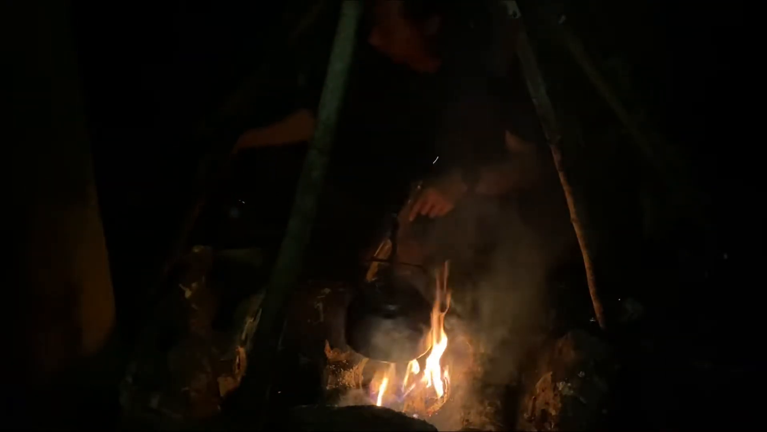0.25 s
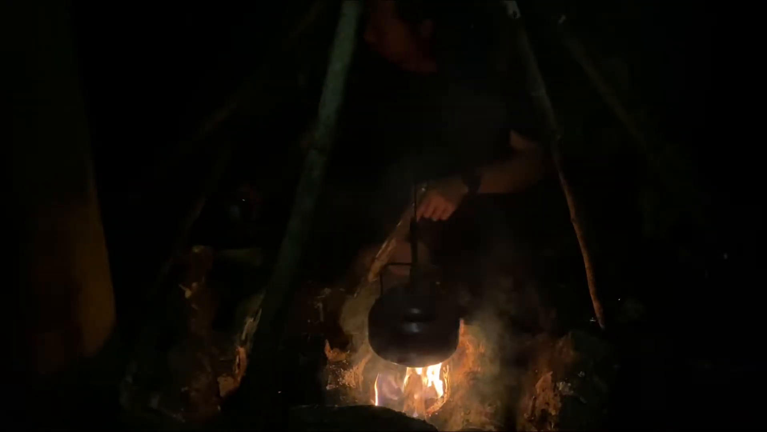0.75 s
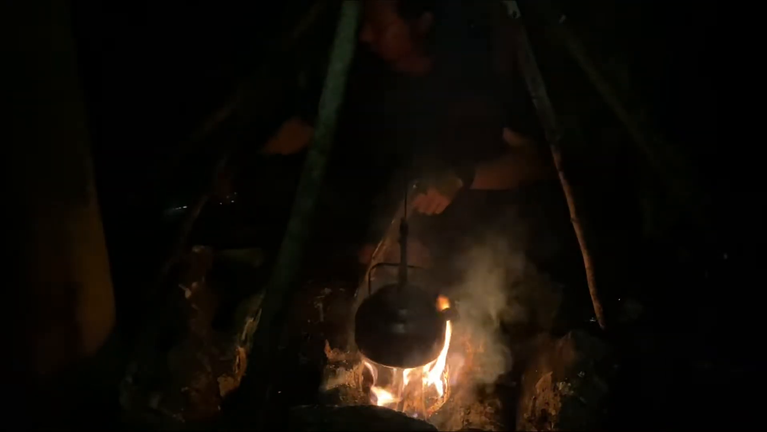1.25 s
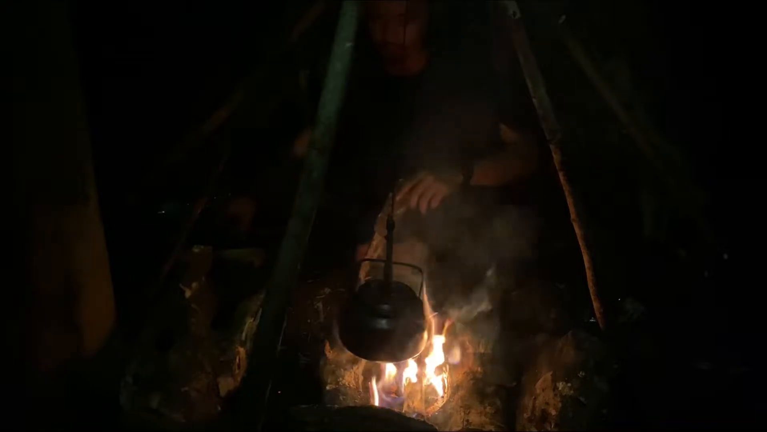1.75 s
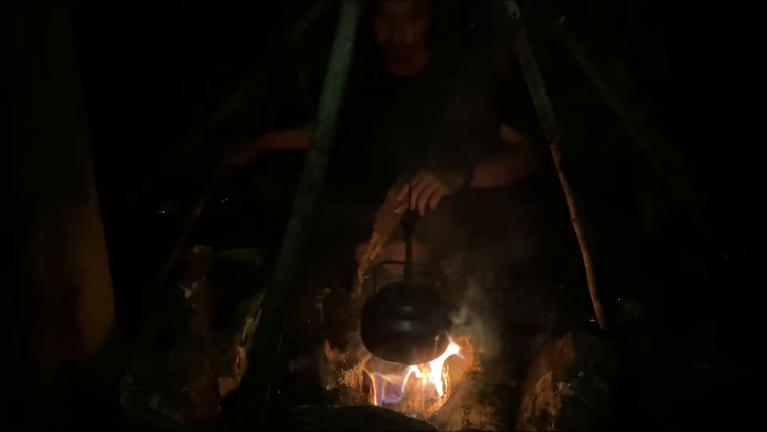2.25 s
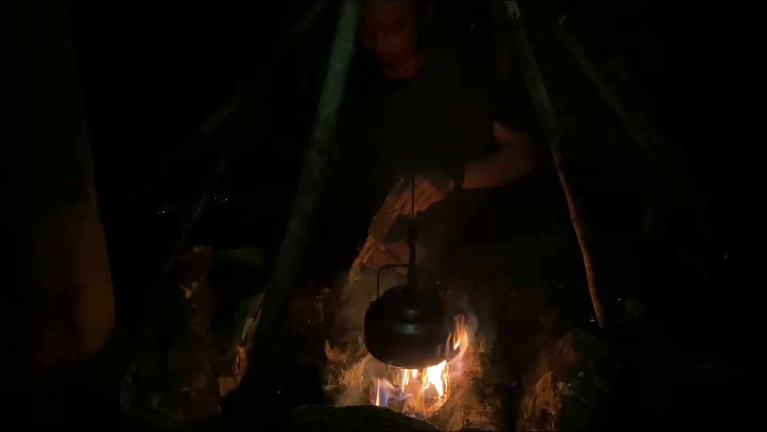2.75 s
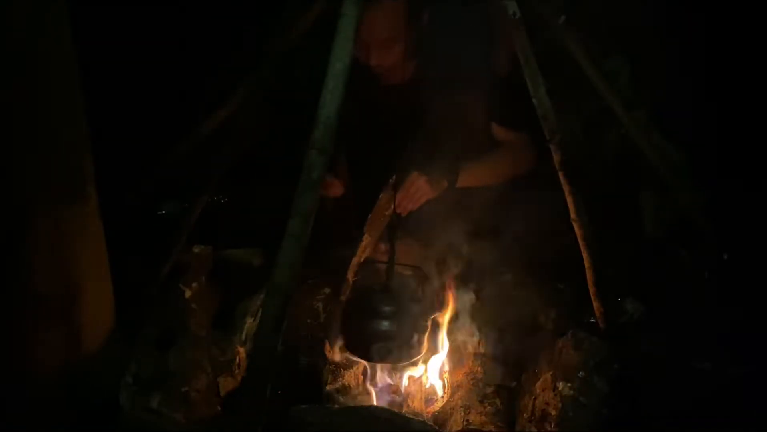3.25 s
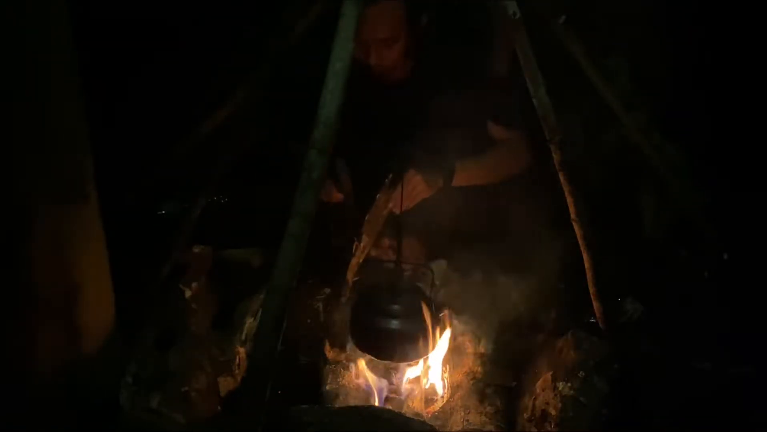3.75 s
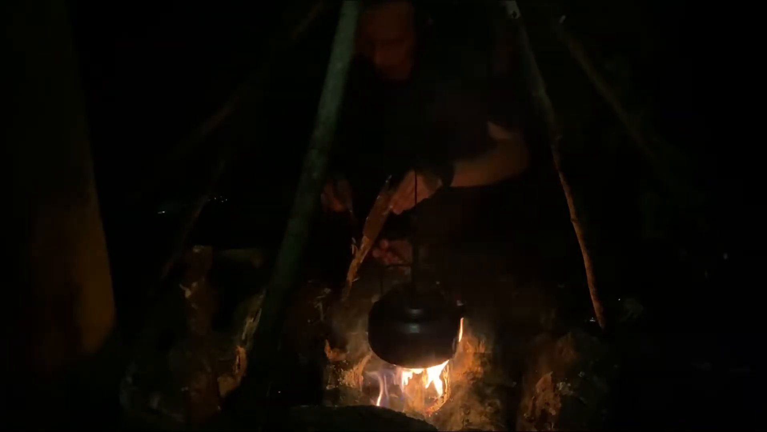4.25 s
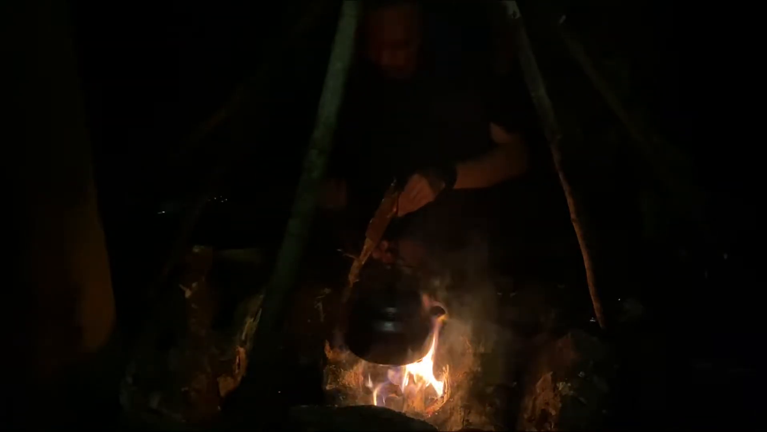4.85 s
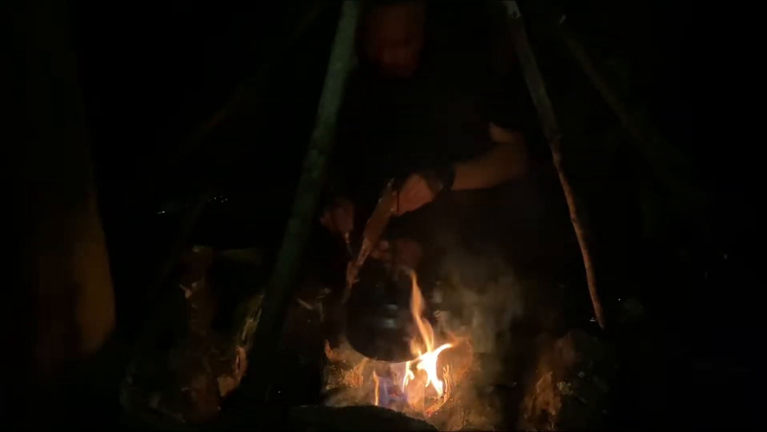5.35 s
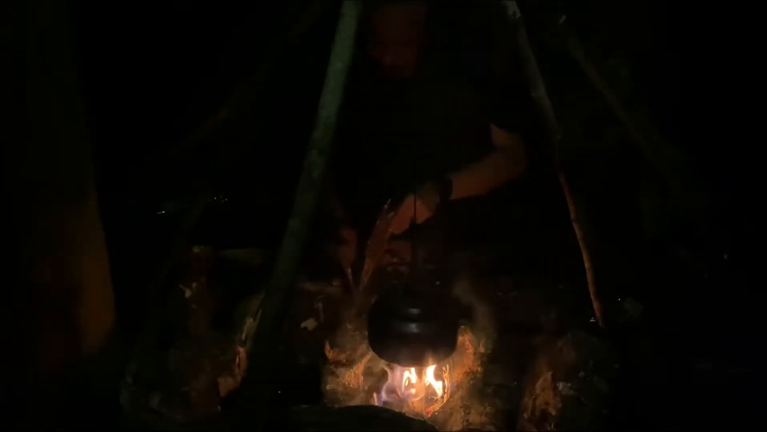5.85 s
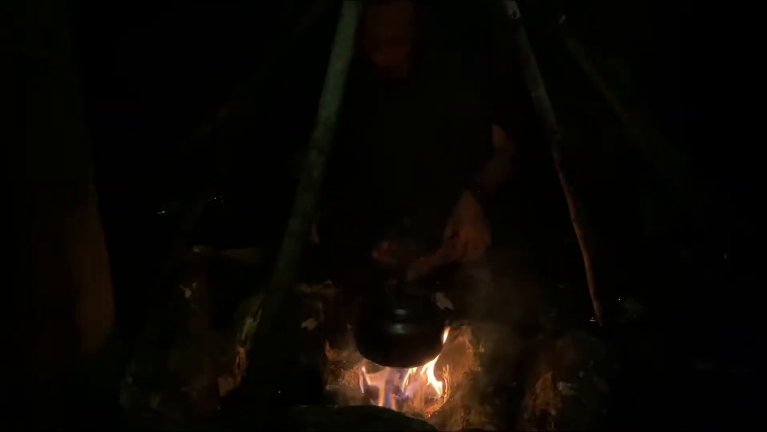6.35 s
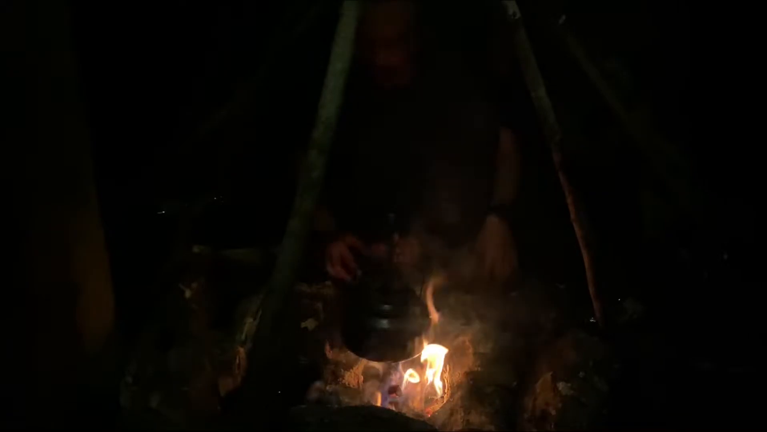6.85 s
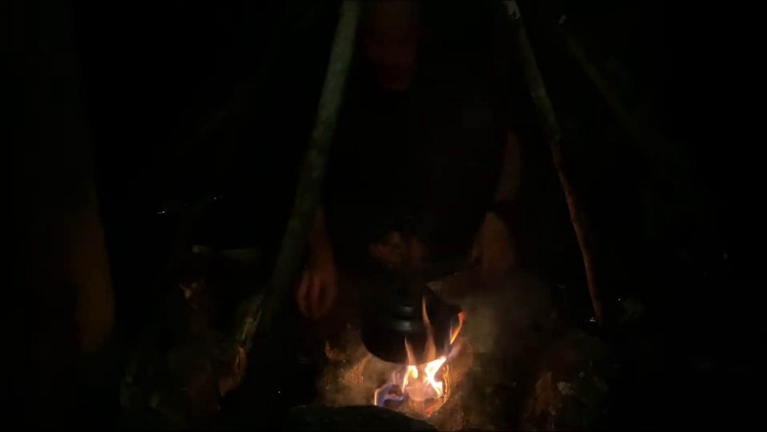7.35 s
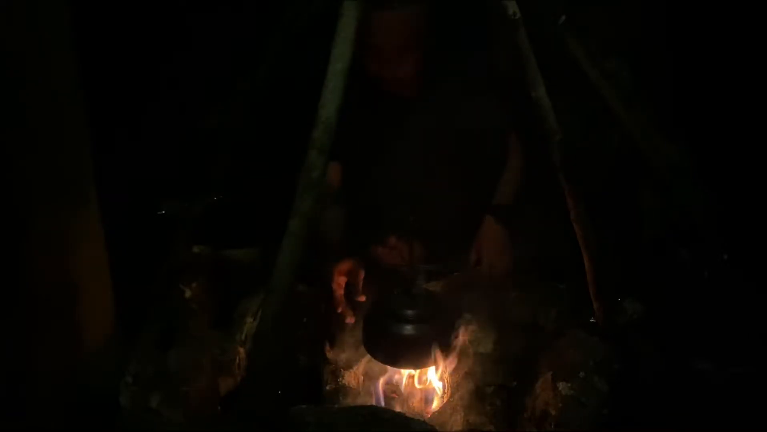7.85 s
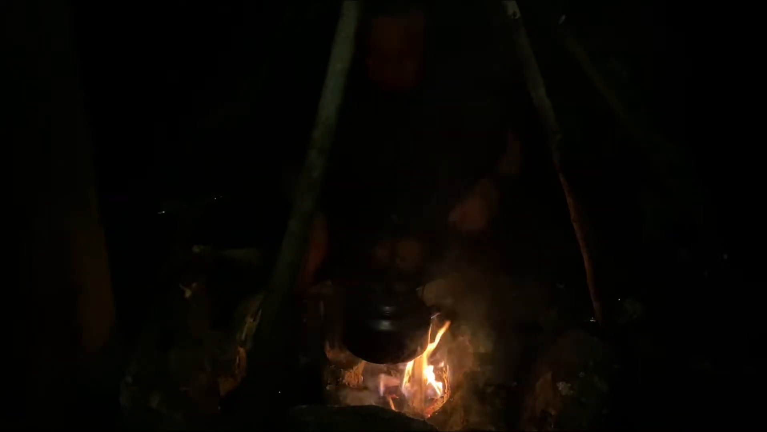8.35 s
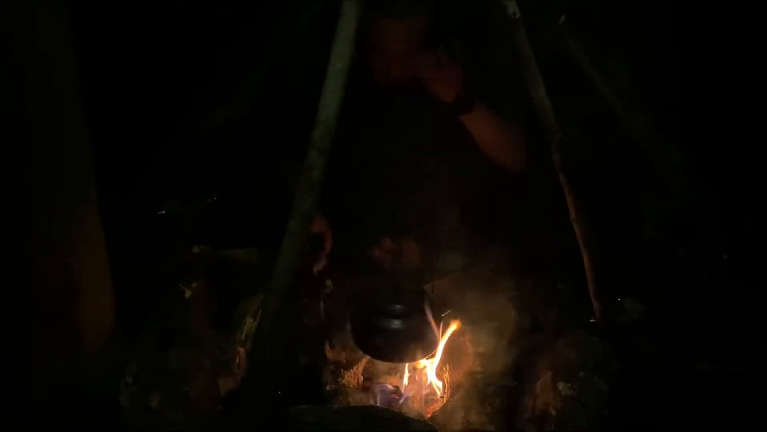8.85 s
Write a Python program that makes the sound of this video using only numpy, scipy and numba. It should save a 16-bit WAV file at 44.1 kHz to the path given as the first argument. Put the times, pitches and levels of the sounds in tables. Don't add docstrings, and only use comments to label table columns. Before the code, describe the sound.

A night forest camp: twigs snap in a quick bundle, heavier sticks crack sharply and thud on soil, over steady insect drone and low fire.

```python
import sys
import numpy as np
from scipy import signal
from scipy.fft import rfft, irfft, next_fast_len
from scipy.io import wavfile
from scipy.ndimage import uniform_filter1d
from numba import njit

SR = 44100
rng = np.random.default_rng(int(sys.argv[2]) if len(sys.argv) > 2 else 0)


def invert_db(x):
    u = np.asarray(x, float) / 20
    return 10 ** u


def waveform_to_disk(signal):
    frames = np.transpose(np.atleast_2d(signal))
    scaled = np.clip(frames, -1, 1) * 32767
    samples = np.round(scaled).astype(np.int16)
    wavfile.write(sys.argv[1], SR, samples)


N = 401442
HZ = np.fft.rfftfreq(next_fast_len(N), 1 / SR)

# start_s, level_db (600-2100 Hz), middle_db and treble_db (above level), fade_ms
TWIGS = [(0.756, -32, 9, -6, 50), (0.792, -36.5, 4, -15, 51), (0.987, -37.5, 11.5, -3, 28),
         (1.032, -29.5, 9.5, -6, 33), (1.061, -57, -1, 3, 21), (1.08, -29.5, 5.5, -4, 39),
         (1.11, -37.5, -7.5, -10, 33), (1.122, -37.5, 0.5, -5, 56), (1.147, -34, -3, -13, 44),
         (1.154, -36.5, 3, 4, 47), (1.166, -35.5, 2.5, -7, 53), (1.185, -40.5, 8, 5, 14),
         (1.216, -42, 2, -2, 120), (1.354, -50.5, 3, -2.5, 47), (1.468, -52, 11, -24, 28.6),
         (1.476, -46.5, 0, -9, 51), (1.502, -42.5, 3, -12, 33), (1.524, -46.5, 5, 3, 30),
         (1.551, -46, -1, -6, 30), (1.576, -49, -1, -10, 70), (1.595, -52, -2, -8, 60),
         (1.372, -55, 0, -6, 60), (1.395, -57, 0, -6, 70), (1.637, -54, 10, -1, 22), (1.681, -62, 9, 6, 25)]
# start_s, level_db (600-2100 Hz), treble_db (above level)
POPS = [(1.8, -56, -18), (2.268, -56, -3), (2.399, -55, 5.5), (2.498, -61, -4), (2.662, -74, -22),
        (3.027, -55, -27), (3.077, -63.5, -24), (3.272, -63, -4), (4.866, -57.5, -3.5), (5.016, -68, -9),
        (5.133, -64.5, 11), (5.862, -44.5, -23), (7.89, -55, -5), (8.583, -69, -21.5)]
# start_s, level_db (600-2100 Hz), middle_db and treble_db (above level), swell_ms
LOGS = [(3.536, -43, 7.5, 0, 3), (3.542, -44, 7, 3, 4), (3.547, -36, 4, 7, 5.8), (3.554, -50, 8, 7, 3),
        (4.031, -47, 12.5, 9, 5.1), (4.038, -37.5, 7.5, 6, 7), (4.045, -33, -12, -1, 2.8),
        (4.053, -48, 16, -14, 3.2), (4.534, -32, 2, -6.5, 7.9), (4.546, -32, 7.5, 11, 4.1),
        (4.557, -42.5, 8, -9, 4.1), (5.14, -34.5, -2, -14.5, 4.8), (5.15, -38, 11, 10, 2),
        (5.154, -41, 13, 10, 3), (5.157, -42, 12, 10, 3), (5.733, -30, -3, -12, 2), (5.736, -33, 6, 6, 3),
        (5.738, -26.5, 7, 8, 5.5), (5.744, -34, 8, 5, 2), (5.748, -45, 8, 3, 2), (6.806, -41, -5, -14, 1),
        (6.816, -37.5, -8.5, -17.5, 5)]
# (600-2100 Hz, relative to treble)
SPARKS = [(0.063, -54.5, -17), (0.546, -53.5, -28), (0.697, -47, -6), (0.727, -43, -16), (1.341, -58, -8),
          (3.699, -56, -24), (5.052, -64, -16), (5.286, -49, -26), (5.343, -45, -25), (5.46, -59, -23),
          (7.525, -61.5, -23.5), (7.959, -60, -20), (8.229, -61, -20.5), (6.43, -64, -19),
          (8.08, -64.5, -12.5), (4.33, -71, -18), (3.11, -74, -20), (7.06, -71, -20), (7.275, -72, -20)]
# frequency_hz, density_db (per Hz)
TWIG_COLOUR = [(150, -27), (250, 6), (1100, 11), (2490, 6), (4490, 1), (5830, -6.5), (6140, -6.5),
               (7440, -3), (8700, -14.5), (10900, -14), (13400, -14.5), (14900, -19), (16000, -49.5)]
THIN_COLOUR = [(300, -20), (600, -6), (800, 10), (1100, 11), (2490, 6), (4490, 1), (7440, -4), (10900, -14),
               (14900, -19), (16000, -49)]
LOG_COLOUR = [(150, -31), (250, 0), (557, 2.5), (2910, 0), (3460, 3), (3910, -2), (4650, 2), (5730, -4.5),
              (6820, -4), (9330, -17.5), (10700, -20.5), (13200, -19.5), (16000, -29)]
SPARK_COLOUR = [(250, 9), (1100, -7), (4500, -10), (8500, -4), (11500, 1.5), (13500, 5), (15500, -2),
                (16500, -30)]
THIN_TWIGS_FROM_S = 1.3
SNAP_SWELL_MS, POP_FADE_MS, SPARK_FADE_MS, LOG_FADE_MS = 0.8, 44, 17, 34
POP_MIDDLE_DB, SPARK_MIDDLE_DB = 1, 7

# start_s, peak_db, pitch_hz, fade_ms
KNOCKS = [(1.235, -37, 280, 37), (4.552, -29, 305, 60), (4.046, -33, 300, 60), (3.55, -38, 300, 60),
          (1.802, -49, 291, 97), (2.275, -41, 300, 28), (3.034, -50, 300, 100), (3.08, -48, 285, 64),
          (3.28, -54, 270, 64), (3.546, -36.5, 580, 70), (4.044, -25.5, 570, 25), (4.547, -22, 520, 44),
          (5.153, -9.5, 476, 15.5), (6.818, -46, 547, 40), (5.15, -24, 250, 60), (1.359, -53, 842, 83),
          (5.8615, -36, 1140, 22), (5.8615, -40, 1700, 20), (2.272, -52, 854, 60), (4.868, -62, 740, 84),
          (6.818, -51, 757, 320), (6.862, -52, 700, 90), (6.8394, -53, 1370, 180), (2.2714, -55, 1110, 55),
          (2.3974, -43, 1800, 30), (3.3942, -65.5, 1220, 70), (5.3426, -51, 1580, 52),
          (6.8174, -39, 1950, 55), (7.889, -53, 1180, 35), (8.5849, -61.5, 1130, 59),
          (4.5491, -20, 4744, 29), (5.3428, -39, 5080, 28), (5.7544, -34.5, 5240, 115),
          (0.758, -40, 1060, 40), (0.758, -40, 1800, 40), (1.034, -38, 1050, 40), (1.034, -36, 2150, 40),
         (1.034, -36, 5600, 30), (1.082, -37, 1100, 45), (1.082, -38, 2100, 50), (1.124, -43, 1300, 30),
         (1.152, -42, 1750, 90), (1.165, -43, 802, 50), (1.172, -46, 1080, 50), (1.186, -44, 900, 30),
         (1.217, -46, 700, 50), (1.16, -45, 425, 90), (1.238, -41, 436, 120), (1.24, -45, 581, 110),
         (1.245, -54, 910, 90), (1.388, -56, 1120, 140), (1.58, -52, 1100, 100), (1.58, -56, 1750, 90),
         (5.734, -34, 1500, 40), (5.741, -28, 1790, 50), (5.744, -20, 4600, 30), (5.743, -24, 5230, 40),
         (5.743, -25, 11100, 30), (5.742, -27, 10400, 40), (5.745, -28, 3450, 40), (5.152, -30, 2800, 35),
         (5.155, -28, 6800, 50), (6.808, -46, 800, 30), (6.818, -44, 1766, 45), (6.818, -48, 2358, 50)]
# crest_s, peak_db, pitch_hz, fade_ms
THUDS = [(1.25, -41, 132, 84), (3.5615, -32.5, 130, 90), (4.0625, -25, 117, 27), (4.5605, -25, 143, 69),
         (4.5675, -31, 125, 60), (5.1645, -22, 131, 56), (5.753, -31, 125, 46), (5.801, -26, 125, 70.3),
         (6.8348, -35, 160, 103), (6.8785, -30.5, 138, 33), (6.928, -40, 149, 48)]

# start_s, hold_s, level_db (600-2100 Hz), treble_db (above level)
RUSTLE = [(0.01, 0.027, -81, 6), (0.73, 0.097, -69, -5), (0.87, 0.046, -87, 15.5), (1.06, 0.12, -55, -13),
          (1.322, .1, -75.5, -11), (1.527, 0.087, -65.5, -2), (1.822, 0.017, -80, 3),
          (2.425, 0.16, -78.5, 1.5), (3.06, .04, -87, -15), (3.62, .03, -96.5, 22),
          (4.115, 0.026, -88, 7.5), (4.66, 0.082, -85.5, 9), (5.197, 0.055, -97, 25.5),
          (5.336, 0.022, -80, 12), (5.79, 0.12, -76, 9.5), (6.379, 0.087, -91.5, 14),
          (6.865, 0.04, -75, -5), (7.919, 0.062, -91, 5), (8.393, 0.071, -92, 7), (8.884, .06, -103, 22.5)]
STIR_DB_PER_S, SETTLE_DB_PER_S, HUSH_DB, HUSH_TREBLE_DB = 238.5, 138.5, -86.5, -100

# time_s, level_db, wing_resonance_hz
KATYDID = [(0.0, -73, 7200), (0.23, -61.5, 7260), (0.63, -57.5, 7180), (1.24, -54, 7290), (2.43, -52, 7396),
           (3.75, -53, 7450), (4.05, -55, 7520), (5.12, -55, 7460), (5.35, -65.5, 7590), (5.7, -75.5, 7250),
           (6.79, -78, 7360), (7.88, -84.5, 7440), (8.44, -62, 7220), (8.72, -58, 7180), (9.1, -54.5, 7310)]
KATYDID_WIDTH_HZ, KATYDID_GAIN_DB, OVERTONE_DB = 380, -2.14, -39
STROKES_HZ, SECOND_STROKE, STROKE_EVENNESS = 57, 0.25, 0.7

# time_s (9 ms after the chirp begins), level_db
CHIRPS = [(0.231, -66.5), (0.659, -64), (1.059, -70), (1.459, -65), (1.924, -66), (2.357, -65),
          (2.748, -65.5), (3.113, -66), (3.532, -61), (3.929, -61), (4.361, -72), (4.74, -66.5),
          (5.37, -66.5), (5.78, -65), (6.217, -64.5), (6.604, -66), (7.027, -64.5), (7.411, -64),
          (7.776, -64), (8.191, -65.5), (8.58, -64.5), (9.004, -64)]
CHIRP_FROM_HZ, CHIRP_TO_HZ, CHIRP_S, CHIRP_ECHO_DB, CHIRP_T60_S = 2960, 2564, 0.06, 10.5, 0.78

# frequency_hz, density_db (per Hz)
FIRE = [(15, -60.5), (25, -24), (30, -24.5), (41, -11), (65, 1.5), (78, -4), (91, -4), (123, -6),
        (220, -14), (296, -28), (651, -41.5), (2000, -66), (2200, -38.5), (2860, -56), (4840, -120)]
# time_s, roar_db
FLAMES = [
    (0.0, -53.5),
    (0.68, -53),
    (2.03, -56),
    (2.91, -53.5),
    (3.12, -57),
    (3.72, -54.5),
    (5.47, -56.5),
    (5.88, -54.5),
    (6.89, -54.5),
    (9.1, -57),
]
# pitch_hz, width_hz, level_db
DRONE = [
    (167.6, 9, -3),
    (217, 9.13, -3),
    (273, 12, -5),
    (326.5, 12, -9.5),
]
DRONE_DB, DRONE_FOLLOWS, DRONE_DIES_DB_PER_S, CALM_DB = -62.5, 1.78, 0.95, -54.5

# pitch_hz,
# width_hz, level_db, left_minus_right_db, likeness (0-1), throb_db
CHORUS = [(2440, 190, -72, -1, 0, 2.5), (2804, 380, -71.5, -3.5, 0.4, -2), (2959.5, 150, -60, 0, 0.03, 0),
          (3440, 140, -58.5, 1.5, 0, 1.5), (3678, 280, -70.5, 9, 0.1, 0.5), (4396, 720, -67.5, 4.5, 0, 1.5),
          (4680, 773, -65.5, 0.5, 0.55, 1), (5240, 430, -77.5, 3, 0.03, 1.5),
          (5833, 565, -58, 5.5, 0.03, -1.05), (7010, 280, -74, 0, 0.2, -2), (7335, 660, -61, -4.5, .15, 2),
          (11260, 3300, -88, 0, 0.8, 4.5), (14700, 1420, -93.5, -5.5, 0.71, 5)]

TRUNKS_T60_S, TRUNKS_DB, TRUNKS_DULL_HZ = 0.33, -21.5, 7000
# frequency_hz, left_lead_rad
PORT_LEAD = [(0, 0), (1380, 1.7), (3880, 3.9), (8100, 9.6), (8960, 9.4), (9730, 6.5), (11600, 6.0),
             (12500, 3.9), (14200, 2.7), (15300, 0)]
MIC_NOTCH_HZ, MIC_NOTCH_WIDTH_HZ, MIC_TOP_HZ, MIC_BASS_HZ, LIMIT = 13500, 800, 15800, 36, 0.6


def unit(x):
    return x / np.sqrt(np.mean(x ** 2))


def shape(x, gain):
    return irfft(rfft(x, next_fast_len(N)) * gain, next_fast_len(N))[..., :N]


def colour(points):
    hz, db = np.transpose(points)
    return invert_db(np.interp(np.log(HZ + 1), np.log(hz), db))


def curves(table):
    s, *columns = np.transpose(table)
    return [np.interp(np.arange(N) / SR, s, c) for c in columns]


def walk(rate):
    k = int(SR / rate)
    held = np.repeat(rng.standard_normal(N // k + 1), k)
    return 1.03 * uniform_filter1d(uniform_filter1d(held, k), k)[:N]


def pair(source, like):
    share = np.clip(like, 0, 1)
    return np.sqrt(share) * source() + np.sqrt(1 - share) * np.array([source(), source()])


def sides(pan_db):
    return invert_db(np.array([[pan_db], [-pan_db]]) / 2)


def fibres(spread_db):
    sizes = np.minimum(rng.exponential(size=N // 8 + 1), 1.6)
    return unit(rng.standard_normal(N) * invert_db(spread_db * np.repeat(sizes, 8)[:N]))


def three_bands(spread_db, likeness, envelopes, points):
    shared = fibres(spread_db)
    own = np.array([fibres(spread_db), fibres(spread_db)])
    above = [1 / (1 + (hz / (HZ + 1)) ** 8) for hz in (2150, 8500)]
    bands = [1 - above[0], above[0] - above[1], above[1]]
    out = 0
    for envelope, band, like in zip(envelopes, bands, np.clip(likeness, 0, 1)):
        gain = colour(points) * band
        grain = np.sqrt(like) * shared + np.sqrt(1 - like) * own
        out = out + shape(grain * envelope, gain / np.sqrt(np.mean(gain ** 2)))
    return out


def cracks(table, points, spread_db, like, gain_db):
    envelopes, t = np.zeros((3, N + SR)), np.arange(SR // 5) / SR
    for s, low_db, mid_db, top_db, swell_ms, fade_ms in table:
        swell = max(swell_ms, 0.1) / 1000
        fade = invert_db(-60000 * (t - swell) / max(fade_ms, 3))
        burst = np.where(t < swell, (t / swell) ** 2, fade)
        band_db = low_db + gain_db + np.array([[0], [mid_db], [top_db]])
        at = int(s * SR)
        envelopes[:, at:at + len(t)] += invert_db(band_db) * burst
    return three_bands(spread_db, like, envelopes[:, :N], points)


def snaps(thin):
    twigs = [(s, db, mid, top, SNAP_SWELL_MS, fade_ms) for s, db, mid, top, fade_ms in TWIGS
             if (s > THIN_TWIGS_FROM_S) == thin]
    if thin:
        return twigs
    return twigs + [(s, db, POP_MIDDLE_DB, top, SNAP_SWELL_MS, POP_FADE_MS) for s, db, top in POPS]


def sparks():
    return [(s, db + low, SPARK_MIDDLE_DB - low, -low, SNAP_SWELL_MS, SPARK_FADE_MS)
            for s, db, low in SPARKS]


def knocks():
    out, t = np.zeros(N + SR), np.arange(SR // 4) / SR
    for s, db, hz, fade_ms in KNOCKS:
        push = 1 - np.exp(-(t * hz / 0.44) ** 2)
        ring = push * invert_db(-60000 * t / fade_ms)
        out[int(s * SR):][:len(t)] += invert_db(db - 4.0) * ring * np.sin(2 * np.pi * hz * t)
    return out[:N] * sides(0.3)


def thuds():
    out, t = np.zeros(N + SR), np.arange(-SR // 50, SR // 4) / SR
    for s, db, hz, fade_ms in THUDS:
        ring = np.where(t < 0, np.exp(-(t * hz / 0.56) ** 2), invert_db(-60000 * t / fade_ms))
        sag = 1 - 1.8 * np.clip(t, 0, 0.05)
        out[int((s + t[0]) * SR):][:len(t)] += invert_db(db) * ring * np.cos(2 * np.pi * hz * t * sag)
    return out[:N] * sides(-4.0)


def rustle():
    t, low, top = np.arange(N) / SR, invert_db(HUSH_DB), invert_db(HUSH_TREBLE_DB)
    for s, hold_s, db, top_db in RUSTLE:
        rise = STIR_DB_PER_S * np.maximum(s - t, 0)
        settle = SETTLE_DB_PER_S * np.maximum(t - s - hold_s, 0)
        stir = invert_db(db - rise - settle)
        low, top = low + stir, top + invert_db(top_db) * stir
    flicker = invert_db(2 * walk(30) + 3.5 * walk(150))
    envelopes = [low * flicker, low * invert_db(0.5) * flicker, top * flicker]
    return three_bands(4.0, [0.5, 0.4, 0.7], envelopes, TWIG_COLOUR)


@njit
def wing(x, hz):
    y, phase = np.empty(len(x)), 0.
    for i in range(len(x)):
        phase += 2 * np.pi * hz[i] / SR
        y[i] = (x[i] * np.exp(1j * phase)).real
    return y


def katydid():
    db, hz = curves(KATYDID)
    phase = 2 * np.pi * np.cumsum(STROKES_HZ * (1 + 0.0034 * walk(3))) / SR
    strong = np.exp(1.25 * (np.cos(phase) - 1))
    weak = SECOND_STROKE * np.exp(2.5 * (np.cos(phase - 2.6) - 1))
    low_pass = 1 / (1 + (2 * HZ / KATYDID_WIDTH_HZ) ** 4)

    def scrape():
        return shape(rng.standard_normal(N), low_pass) + 1j * shape(rng.standard_normal(N), low_pass)

    teeth = pair(scrape, 0.55)
    evened = teeth / (np.abs(teeth) + 0.2 * np.std(teeth)) ** np.clip(STROKE_EVENNESS, 0, 1)
    scraped = evened * (strong + weak)
    voice = [unit(wing(v, hz)) + invert_db(OVERTONE_DB) * unit(wing(v ** 2, 2 * hz)) for v in scraped]
    return invert_db(db + KATYDID_GAIN_DB) * sides(-1.39) * np.array(voice)


def cricket():
    out, t = np.zeros(N + SR), np.arange(int(CHIRP_S * SR)) / SR
    turns = np.cumsum(CHIRP_FROM_HZ + (CHIRP_TO_HZ - CHIRP_FROM_HZ) * t / CHIRP_S) / SR
    whistle = np.sin(np.pi * t / CHIRP_S) ** 0.94 * np.sin(2 * np.pi * turns)
    for s, db in CHIRPS:
        out[int((s - 0.009) * SR):][:len(t)] += invert_db(db) * whistle
    direct = out[:N] * sides(-13.5)
    return direct + trunks(out[:N] * sides(-1.5), CHIRP_T60_S, CHIRP_ECHO_DB)


def fire():
    roar_db, = curves(FLAMES)
    drone_db = DRONE_DB + DRONE_FOLLOWS * (roar_db - CALM_DB)
    drone_db = drone_db - DRONE_DIES_DB_PER_S * np.arange(N) / SR
    roar, tone = 0, colour(FIRE)
    for hz in 32 * 2. ** np.arange(8):
        band = np.cos(np.pi / 2 * np.clip(np.log2((HZ + 1) / hz), -1, 1))
        air = pair(lambda: rng.standard_normal(N), 1 / (1 + (hz / 300) ** 2))
        pan_db = -3.6 / (1 + (hz / 350) ** 2)
        roar = roar + shape(air, tone * band) * sides(pan_db) * invert_db(2.1 * walk(7.2))
    lines = sum(invert_db(db) / (1 + (2 * (HZ - hz) / width_hz) ** 2) for hz, width_hz, db in DRONE)
    hum = unit(shape(pair(lambda: rng.standard_normal(N), 0.51), lines)) * sides(-4.3)
    return unit(roar) * invert_db(roar_db + 1.5) + hum * invert_db(drone_db - 3.0)


def chorus():
    out = 0
    for hz, width_hz, db, pan_db, like, throb_db in CHORUS:
        resonance = 1 / (1 + (2 * (HZ - hz) / width_hz) ** 2) ** 1.6
        crowd = unit(shape(pair(lambda: rng.standard_normal(N), like), resonance))
        level_db = db + 0.28 * walk(0.59) + throb_db * walk(9)
        out = out + invert_db(level_db) * sides(pan_db) * crowd
    return out


def trunks(x, t60_s, db):
    t = np.arange(SR // 2) / SR
    echoes = rng.standard_normal((2, len(t))) * invert_db(-60 * t / t60_s) * np.clip(t / 0.037, 0, 1)
    echoes = echoes / np.sqrt(np.sum(echoes ** 2, axis=1, keepdims=True))
    wet = signal.fftconvolve(x, echoes, axes=1)[:, :N]
    return invert_db(db) * shape(wet, 1 / (1 + (HZ / TRUNKS_DULL_HZ) ** 2) ** 0.5)


def ports(x):
    late = np.exp(-1j * np.interp(HZ, *np.transpose(PORT_LEAD)))
    return np.array([x[0], shape(x[1], late)])


def scene():
    logs = [(*row, LOG_FADE_MS) for row in LOGS]
    wood = cracks(snaps(False), TWIG_COLOUR, 3.1, [0.8, 0.55, 0.9], -2.77)
    wood = wood + cracks(snaps(True), THIN_COLOUR, 3.1, [0.8, 0.55, 0.9], -3.5)
    wood = wood + cracks(logs, LOG_COLOUR, 9.5, [0.7, 0.35, 0.8], -2.32)
    wood = wood + cracks(sparks(), SPARK_COLOUR, 2.5, [0.8, 0.6, 0.9], -1.5) + knocks()
    near = ports(wood + rustle() + chorus()) + trunks(wood, TRUNKS_T60_S, TRUNKS_DB) + thuds()
    return near + katydid() + cricket() + fire()


def top_cut(x):
    return signal.sosfilt(signal.butter(12, 16990, fs=SR, output="sos"), x)


def record(dry):
    notch = 1 - 0.64 / (1 + (2 * (HZ - MIC_NOTCH_HZ) / MIC_NOTCH_WIDTH_HZ) ** 2)
    top = 1 / (1 + (HZ / MIC_TOP_HZ) ** 60)
    bass = 1 / (1 + (MIC_BASS_HZ / (HZ + 1)) ** 4)
    heard = LIMIT * np.tanh(shape(dry, notch * top * bass) / LIMIT)
    return top_cut(heard)


dry = scene()
out = record(dry)
waveform_to_disk(out)
```